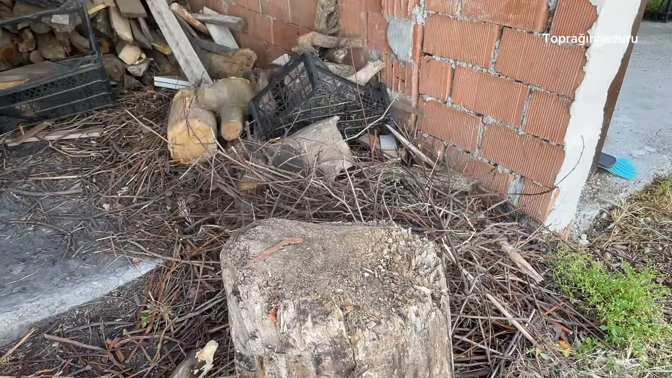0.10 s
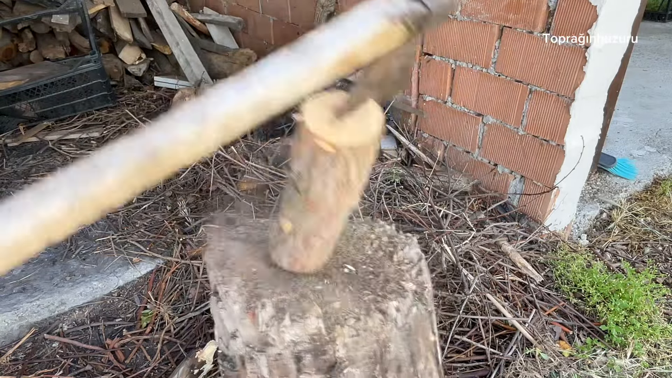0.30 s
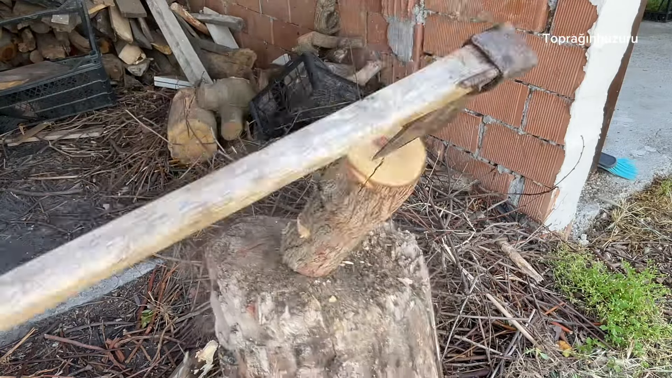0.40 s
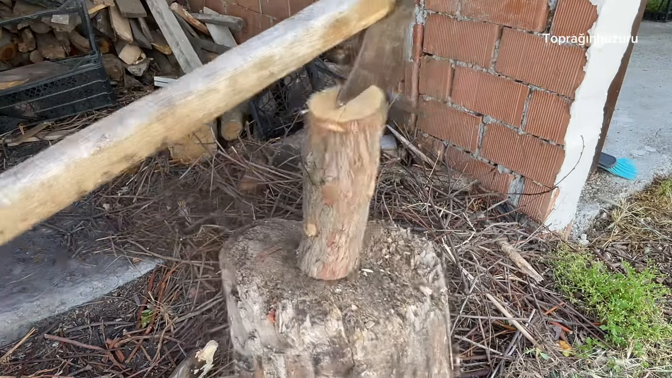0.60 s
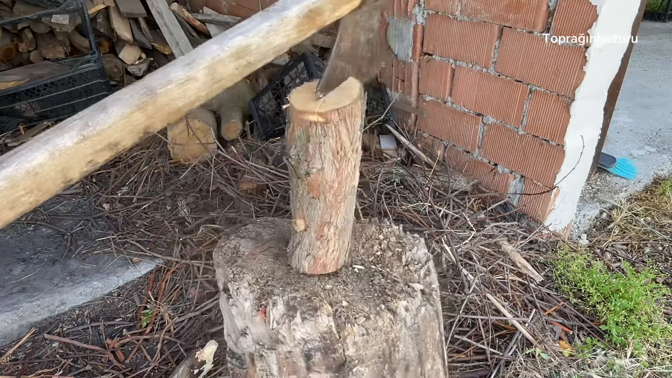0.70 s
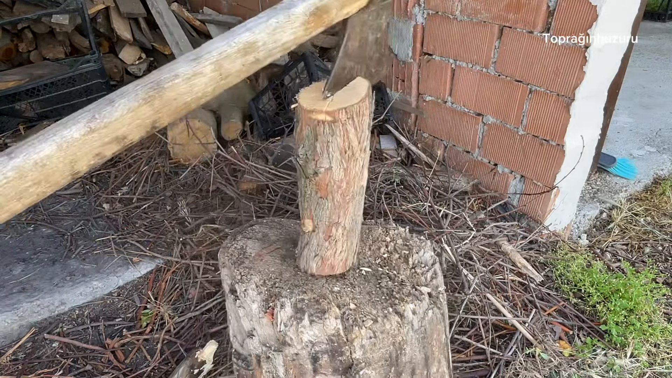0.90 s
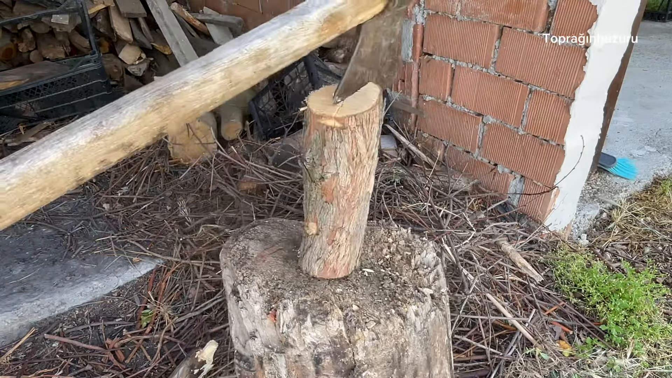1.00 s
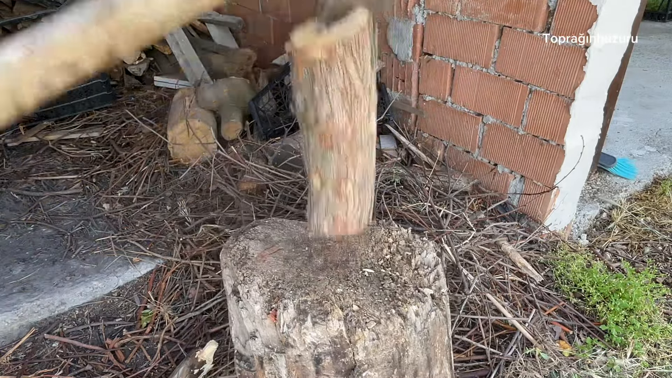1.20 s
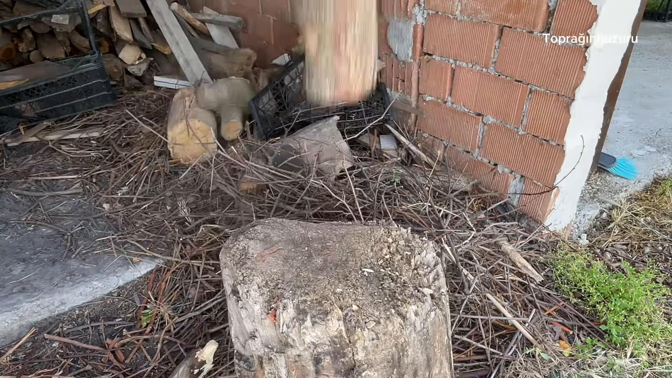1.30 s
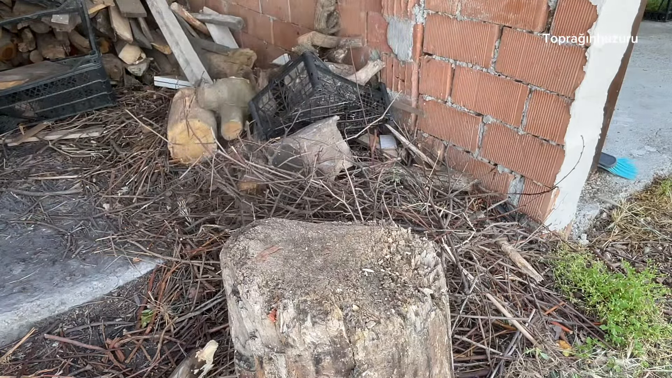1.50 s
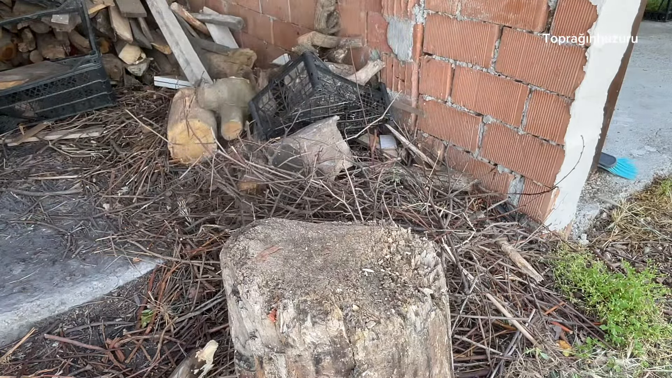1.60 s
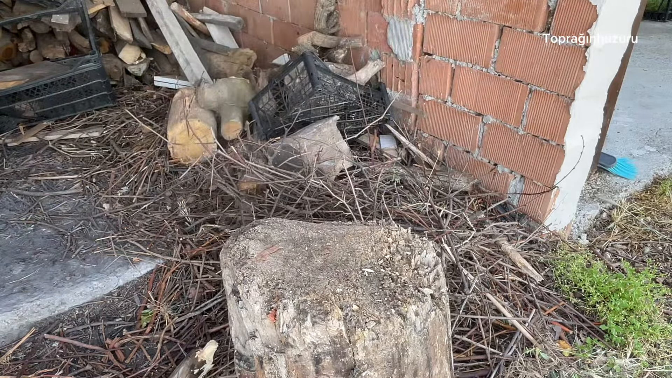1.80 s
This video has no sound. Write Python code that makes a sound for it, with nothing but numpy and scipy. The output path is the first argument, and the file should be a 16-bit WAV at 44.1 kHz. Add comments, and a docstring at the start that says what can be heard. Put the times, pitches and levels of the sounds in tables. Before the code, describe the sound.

One hard axe blow: a log cracks and thumps on a stump, echoing briefly around a yard.

```python
"""First a soft outdoor hiss with a low rumble and faint hum, then a short rush of air.
An axe stuck in a short log slams down on a stump: the blade cracks the log and the stump thumps just after.
Wood is a set of decaying tones; cracks, scatter off nearby walls, bark and dust are shaped noise.
A far wall returns one echo. Far birds are a gliding whistle and noise-blurred chirps, all heard by a phone."""
import sys
import numpy as np
from scipy import signal
from scipy.fft import rfft, irfft
from scipy.io import wavfile
from scipy.ndimage import uniform_filter1d

SR = 44100
rng = np.random.default_rng(int(sys.argv[2]) if len(sys.argv) > 2 else 0)


def store_wav(level_fs):
    """Save 16-bit WAV to argv[1]."""
    pcm = np.round(np.clip(np.atleast_2d(level_fs), -1, 1) * 32767)
    wavfile.write(sys.argv[1], SR, pcm.T.astype(np.int16))


N = 79380
T = np.arange(N) / SR  # time in s
FREQS = np.fft.rfftfreq(N, 1 / SR)  # Hz
LR = np.array([[1], [-1]])  # plus on the left, minus on the right


def undb(db):
    """Turn dB into a plain multiplier."""
    return 10 ** (np.asarray(db) / 20)


def read_by_pitch(table, hz, column=1):
    """Read a column of a table between its frequencies, on a log scale."""
    rows = np.array(table, float)
    return np.interp(np.log(hz + 1), np.log(rows[:, 0] + 1), rows[:, column])


def read_by_time(table, column=1):
    """Read a column of a table at every moment, in straight lines between its times."""
    rows = np.array(table, float)
    return np.interp(T, rows[:, 0], rows[:, column])


def unit(x):
    """Scale to an average (rms) strength of 1."""
    return x / np.sqrt(np.mean(x ** 2))


def noise(gain, channels=2):
    """Separate random noises, coloured by a gain for each frequency, rms 1 overall."""
    white = rfft(rng.standard_normal((channels, N)))
    return unit(irfft(white * gain(FREQS), N))


def colour(table):
    """Make a gain for each frequency from a table; silent up to its first frequency."""
    return lambda f: undb(read_by_pitch(table, f)) * (f > table[0][0])


def walk(rate):
    """A smooth random wander with rms 1, with about `rate` new random values a second."""
    k = int(SR / rate)
    steps = np.repeat(rng.standard_normal(N // k + 1), k)
    smooth = uniform_filter1d(uniform_filter1d(steps, k), k)
    return unit(smooth[:N])


def die_away(t, t60):
    """Exponential fall that drops 60 dB in t60 seconds."""
    return np.exp(-np.log(1000) * t / t60)


def fade(start, t60, rise):
    """A quick rise at `start`, then an exponential fall."""
    since = np.maximum(T - start, 0)
    return (1 - np.exp(-since / rise)) * die_away(since, t60)


def spread(pair, side_db):
    """Build left and right from a shared sound and a sideways difference."""
    return pair[0] + undb(side_db) * pair[1] * LR


def pan(left_minus_right_db):
    """Gains that make one side louder than the other."""
    return undb(left_minus_right_db * LR / 2)


def struck(jolts, modes, late):
    """Short smooth pushes set wood ringing in several tones, its modes."""
    push = 0
    for start, db, contact_ms in jolts:
        middle = start + late + contact_ms / 1000
        width = contact_ms / 3000  # s; a longer contact gives a duller sound
        bump = np.exp(-.5 * ((T - middle) / width) ** 2)
        push = push + undb(db) * bump / (width * SR * np.sqrt(2 * np.pi))
    ring = sum(undb(db) * np.sin(2 * np.pi * hz * T) * die_away(T, t60) for hz, db, t60 in modes)
    return signal.fftconvolve(push, ring)[:N]


# jolts of the blade in the log, then of the log on the stump: t/s, relative level/dB, contact/ms
BITES = [(.2228, -15, .1), (.2235, -6, .3), (.2245, -9.5, .3), (.2254, -7, .16)]
THUMPS = [(.2256, -2, 0.58), (.2287, -4.5, 0.96), (.2408, -19.5, 0.52), (.249, -24, .4), (.403, -41, .7)]
# ringing tones of the log and of the stump: f/Hz, relative level/dB, t60/s
LOG = [(1062, -13, .04), (1125, -4.5, .022), (1304, -11, .04), (1530, -14, .045), (1680, -10, .02),
       (2030, -19, .04), (2870, -7.5, .016), (4800, -13, .02), (5400, -14, .012)]
STUMP = [(176, -5.5, 0.052), (236, -4, .025), (322, -5, .035), (395, -5, 0.039), (696, -3, .055)]
# sideways swaying, opposite at the two microphone ports: f/Hz, relative level/dB, t60/s
SWAY_LOG = [(1060, -16.5, .02), (2399, -12, 0.013), (3000, -9, .015)]
SWAY_STUMP = [(470, -14, .025), (580, -7, 0.029), (719.9, -11, .05)]
RIGHT_LATE_S = 0.000044
RADIATES_ABOVE_HZ = 210


def ringing_wood():
    """Log and stump ring and sway after each jolt; wood sends out little of the lowest sound."""
    ears = [struck(BITES, LOG, late) + struck(THUMPS, STUMP, late) for late in (0, RIGHT_LATE_S)]
    sway = struck(BITES, SWAY_LOG, 0) + struck(THUMPS, SWAY_STUMP, 0)
    cut_lows = signal.butter(2, RADIATES_ABOVE_HZ, "high", fs=SR, output="sos")
    return signal.sosfilt(cut_lows, np.array(ears) + LR * sway)


# tone colour of the cracking fibres: f/Hz, relative level/dB per Hz
CRACK = [(900, -26.5), (1500, -4.5), (2150, -16), (5500, -7.5), (7200, -10.5), (9750, -14.5),
         (13300, -29.5), (14400, -42.5), (16400, -34)]
CRACK_DB, CRACK_T60_S, CRACK_RISE_S = -11.5, 0.0056, 0.000067


def cracking_fibres():
    """Wood fibres snap in a tiny burst of noise at each bite of the blade."""
    bursts = sum(undb(db) * fade(start, CRACK_T60_S, CRACK_RISE_S) for start, db, _ in BITES)
    return undb(CRACK_DB) * spread(noise(colour(CRACK)), 1.5) * bursts


def blow():
    """The whole knock: ringing wood plus cracking fibres."""
    return ringing_wood() + cracking_fibres()


SWISH_END_S, SWISH_GROW_S, SWISH_DB = .24, .05, -70
SWISH_HZ = 700  # the noise is strongest a little below this


def swish():
    """Air rushes past log and blade as they fall: noise that grows, then stops as the blow sounds."""
    grow = np.exp(np.minimum(T - SWISH_END_S, 0) / SWISH_GROW_S) * (T < SWISH_END_S)
    rush = noise(lambda f: f / SWISH_HZ / (1 + (f / SWISH_HZ) ** 2.5))
    return undb(SWISH_DB) * grow * spread(rush, -4.0)


# tone colour of the sound scattered in the yard: f/Hz, relative level/dB per Hz
YARD = [(35, -35), (60, -9), (110, -14), (146, -8), (234, -11), (330, -8), (450, -12), (560, -12),
        (650, -3.5), (900, -11), (1060, -8.5), (1570, -14), (2280, -18), (2700, -25), (6120, -33),
        (7500, -36), (9340, -37), (12700, -39), (16400, -54)]
# how it dies away: f/Hz, t60 of the quick decay/s, level of the slow decay/dB against the quick one
YARD_T60 = [(59.5, 0.38, -16.5), (150.33, 0.27, -19.5), (399.4, 0.2, -20), (1000, 0.16, -22),
            (3000, 0.13, -20.5), (8100, 0.2, -26), (16000, .11, -24)]
LATE_LONGER = 3.3  # the slow decay lasts this many times longer
YARD_DB, YARD_RISE_S, YARD_LUMPY_DB, YARD_SIDE_DB = -20, 0.0048, 1, -1


def yard_scatter():
    """Nearby walls scatter the blow: noise in half-octave bands, each lumpy with two decays."""
    start = BITES[0][0]
    edges = 60 * 2 ** (np.arange(18) / 2)  # Hz
    whole = rfft(noise(colour(YARD)))
    out = 0
    for lo, hi in zip(edges[:-1], edges[1:]):
        middle = np.sqrt(lo * hi)
        t60 = read_by_pitch(YARD_T60, middle)
        slow_gain = undb(read_by_pitch(YARD_T60, middle, column=2))
        quick = fade(start, t60, YARD_RISE_S)
        slow = slow_gain * fade(start, t60 * LATE_LONGER, YARD_RISE_S)
        band = irfft(whole * (FREQS >= lo) * (FREQS < hi), N)
        # low bands are nearly the same on both sides
        width = np.array([[1], [min(lo / 450, 1) ** 2]])
        out = out + band * width * (quick + slow) * undb(YARD_LUMPY_DB * walk(90))
    return undb(YARD_DB) * spread(out, YARD_SIDE_DB)


# tone colour of the far wall's echo: f/Hz, relative level/dB per Hz
ECHO = [(120, -14), (200, -5.5), (341, -5.5), (594, -9.5), (1070, -10), (1260, -15), (2200, -12),
        (5730, -18), (7420, -20.5), (9090, -25), (10500, -14.5), (16400, -56)]
ECHO_S, ECHO_DB, ECHO_T60_S = .6112, -58, .16
ECHO_SNAP_DB, ECHO_SNAP_T60_S = 3, 0.036  # level against the longer part
ECHO_KNOCK_DB = -51


def far_echo(knock):
    """A far wall returns uneven noise with a sharp start, plus a faint late copy of the knock."""
    tail = fade(ECHO_S, ECHO_T60_S, 0.0023)
    snap = undb(ECHO_SNAP_DB) * fade(ECHO_S, ECHO_SNAP_T60_S, 0.00071)
    blurred = spread(noise(colour(ECHO)), 0.54) * (tail + snap) * undb(2.5 * walk(150))
    late = int((ECHO_S - BITES[0][0]) * SR)
    copy = np.pad(knock, ((0, 0), (late, 0)))[:, :N]
    return undb(ECHO_DB) * blurred + undb(ECHO_KNOCK_DB) * copy


# bark chips landing: t/s, relative level/dB, f/Hz, left minus right/dB
CHIPS = [(0.1137, -55, 4000, 7), (0.288, -48, 11100, -1), (0.72, -65, 2794, 1), (0.739, -53.5, 11100, 6),
         (0.7584, -62, 10490, 5), (0.8, -65, 11470, 3), (0.826, -66, 11900, 0), (0.88, -56, 10000, 8),
         (0.9865, -68, 2800, 0), (1.0088, -67, 11050, 1), (1.0702, -69, 11000, -2)]
CHIP_T60_S, CHIP_RISE_S = 0.0096, 0.00017


def bark_chips():
    """Each chip lands with a tick: a very short noise centred on its own pitch."""
    out = 0
    for start, db, hz, pan_db in CHIPS:
        tick = noise(lambda f: 1 / (1 + ((f - hz) / (0.47 * hz)) ** 2) * (f > 1000), channels=1)[0]
        out = out + undb(db) * pan(pan_db) * tick * fade(start, CHIP_T60_S, CHIP_RISE_S)
    return out


# patter of dust swelling and sinking: t/s, relative level/dB
DUST = [(0, -104), (.11, -112), (.2, -79), (.3, -78), (.37, -89), (.444, -71), (.54, -85.5), (.578, -77.5),
        (.66, -81), (.724, -79), (.76, -78.5), (.86, -87), (.89, -80.5), (.944, -97), (1.016, -79.5),
        (1.2, -110)]
# tone colour of the dust: f/Hz, relative level/dB per Hz
DUST_COLOUR = [(880, -31), (1500, -0.5), (3410, -3), (3920, -2.5), (7150, -6.5), (10300, -2), (14400, -15),
               (16400, -13.5)]
DUST_GRAIN_DB = 3


def dust():
    """Fine grains patter down as a hiss whose samples vary randomly in strength."""
    grain_db = DUST_GRAIN_DB * np.minimum(rng.exponential(size=N), 6)
    grains = rng.standard_normal((2, N)) * undb(grain_db + 2 * walk(55))
    hiss = unit(irfft(rfft(grains) * colour(DUST_COLOUR)(FREQS), N))
    ending = np.clip((DUST[-1][0] - T) / 0.068, 0, 1)
    return spread(hiss, -0.55) * undb(read_by_time(DUST)) * ending


# one whistled note: t/s, f/Hz, relative level/dB
WHISTLE = [(1.368, 2090, -89), (1.381, 2198, -73), (1.418, 2150, -74.5), (1.438, 2020, -69),
           (1.471, 1840, -83), (1.5, 1840, -80), (1.535, 1838, -85)]
WHISTLE_PAN_DB, WHISTLE_FLUTTER_DB = -6.5, 1.5  # pan is left minus right


def whistle():
    """One clear bird note: a pure tone that rises briefly, then falls, with a fluttering level."""
    first, last = WHISTLE[0][0], WHISTLE[-1][0]
    on = np.clip(np.minimum(T - first, last - T) / 0.005, 0, 1)
    hz = read_by_time(WHISTLE)
    tone = np.sqrt(2) * np.sin(2 * np.pi * np.cumsum(hz) / SR)
    level = undb(read_by_time(WHISTLE, column=2) + WHISTLE_FLUTTER_DB * walk(90))
    return tone * on * level * pan(WHISTLE_PAN_DB)


# chirps of far birds: t/s, length/s, start f/Hz, end f/Hz, width/Hz, relative level/dB, trill depth/0-1
CHIRPS = [(1.04, 0.077, 5200, 3560, 2200, -78.5, 0.1), (1.244, .085, 1951, 1931, 900, -78, .6),
          (1.395, .1, 5000, 4000, 1900, -79, 0.1), (1.423, .1, 2090, 1950, 400, -86, 0),
          (1.636, .2, 2170, 2200, 600, -78.5, .2), (1.645, .1, 575, 570, 30, -80, 0),
          (1.648, .07, 6048, 5020, 1600, -76, .1), (1.4, 0.11, 2500, 2320, 111.1, -83, 0.2),
          (1.68, .14, 1840, 1820, 80, -77, .1), (1.691, 0.067, 4580, 3800, 1500, -81.5, .3)]
CHIRP_RISE_S, CHIRP_T60_S, CHIRP_TRILL_HZ = 0.016, 0.29, 45
FAR_PAN_DB = -3.5  # left minus right, for the chirps and the outdoor hiss


def far_chirps():
    """Chirps blurred by distance: noise rides on a gliding tone, most of them trilled."""
    out = 0
    for start, length, hz0, hz1, width_hz, db, depth in CHIRPS:
        glide = np.clip((T - start) / length, 0, 1)
        carrier = np.sin(2 * np.pi * np.cumsum(hz0 + (hz1 - hz0) * glide) / SR)
        blur = noise(lambda f: np.exp(-(2 * f / width_hz) ** 2))
        rise = np.clip((T - start) / CHIRP_RISE_S, 0, 1)
        fall = die_away(np.maximum(T - start - length, 0), CHIRP_T60_S)
        trill = 1 - depth * np.cos(2 * np.pi * CHIRP_TRILL_HZ * (T - start))
        out = out + undb(db) * blur * carrier * rise * fall * trill
    return out * pan(FAR_PAN_DB)


# tone colour of the outdoor hiss: f/Hz, relative level/dB per Hz
AIR = [(90, -5), (150, -7.5), (330, -11), (450, -17.5), (580, -13.5), (800, -21.5), (1300, -29),
       (2100, -36.5), (3600, -42), (16400, -61)]
# how alike left and right are: f/Hz, likeness/0-1
AIR_LIKE = [(60, 1), (300, 0.5), (700, .05), (16000, 0.3)]
AIR_DB = -70


def outdoor_hiss():
    """Steady noise with a slow wander in level, most alike on both sides in the lows."""
    likeness = read_by_pitch(AIR_LIKE, FREQS)
    shared_and_side = np.array([np.sqrt(1 + likeness), np.sqrt(1 - likeness)])
    white = rfft(rng.standard_normal((2, N)))
    pair = irfft(white * colour(AIR)(FREQS) * shared_and_side, N)
    return unit(spread(pair, 0)) * undb(AIR_DB + 1.5 * walk(3.9)) * pan(FAR_PAN_DB)


# swelling of the low rumble: t/s, relative level/dB
RUMBLE = [(.01, -65), (.29, -53.5), (.335, -46.5), (.39, -65), (.448, -47.5), (.5, -56.5), (.56, -50),
          (.8, -64), (.89, -56), (1.015, -64), (1.06, -61.5), (1.15, -67.5), (1.38, -67), (1.46, -75),
          (1.73, -64.5), (1.8, -72)]
RUMBLE_HZ, RUMBLE_WIDTH_HZ = 54, 22
RUMBLE_EVEN = .6  # how strongly chance swelling is smoothed out, 0-1


def low_rumble():
    """A narrow band of deep noise, evened out, then made to swell and sink."""
    deep = noise(lambda f: np.exp(-((f - RUMBLE_HZ) / RUMBLE_WIDTH_HZ) ** 2) * (f > 18))
    swelling = np.abs(signal.hilbert(deep)) + .5
    even = [unit(channel) for channel in deep / swelling ** RUMBLE_EVEN]
    return spread(even, -14) * undb(read_by_time(RUMBLE))


# tones of the faint hum: f/Hz, relative level/dB
HUM = [(98, -71), (199, -70), (286, -80), (338, -81)]
# slow swell of the whole hum: t/s, level/dB
HUM_SWELL = [(0, -10), (.6, -3), (1.0, -3), (1.8, -1)]
HUM_WAVER_DB = 2


def faint_hum():
    """A few steady pitches, each wavering in level on its own."""
    out = 0
    for hz, db in HUM:
        level = undb(db + HUM_WAVER_DB * walk(2.1))
        out = out + np.sqrt(2) * level * np.sin(2 * np.pi * hz * T)
    return out * undb(read_by_time(HUM_SWELL))


def scene():
    """Add up everything that reaches the phone."""
    knock = blow()
    action = knock + swish() + yard_scatter() + far_echo(knock) + bark_chips() + dust()
    background = whistle() + far_chirps() + outdoor_hiss() + low_rumble() + faint_hum()
    return action + background


TREBLE_DIP_HZ, TREBLE_DIP_WIDTH_HZ = 8030, 2200
TOP_HZ = 16400


def record(dry):
    """The treble is weak around 8 kHz; the loudest peaks are rounded and the top is cut."""
    b, a = signal.iirpeak(TREBLE_DIP_HZ, TREBLE_DIP_HZ / TREBLE_DIP_WIDTH_HZ, fs=SR)
    dipped = dry - signal.lfilter(b, a, dry)
    rounded = np.tanh(1.124 * dipped) / 1.077
    cut_top = signal.ellip(10, .2, 80, TOP_HZ, fs=SR, output="sos")
    return signal.sosfilt(cut_top, rounded)


dry = scene()
out = record(dry)
store_wav(out)
```